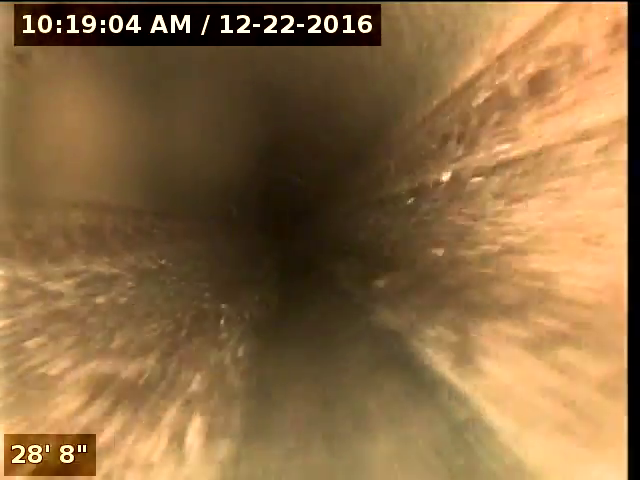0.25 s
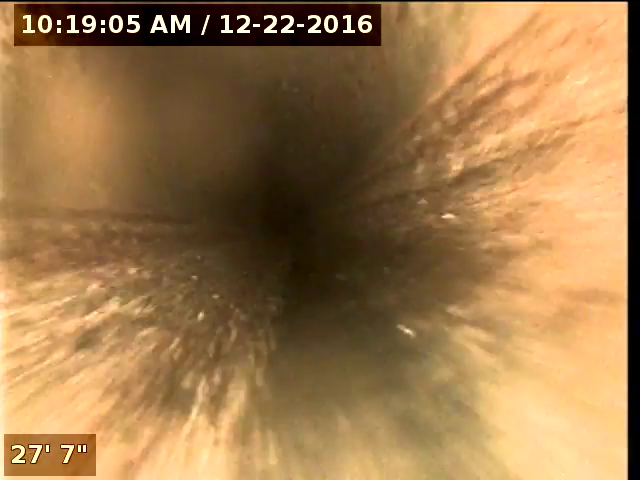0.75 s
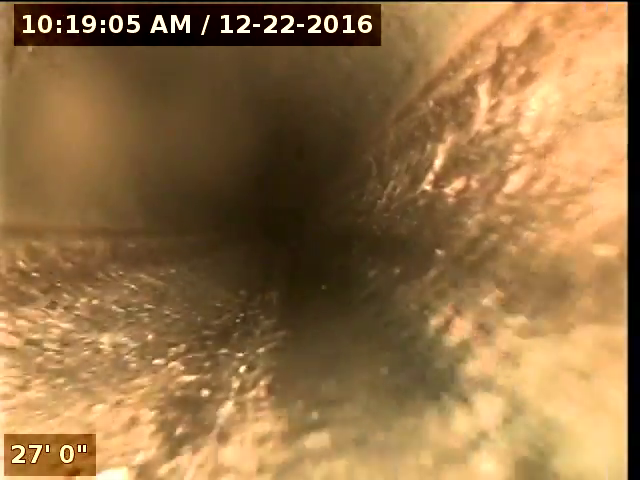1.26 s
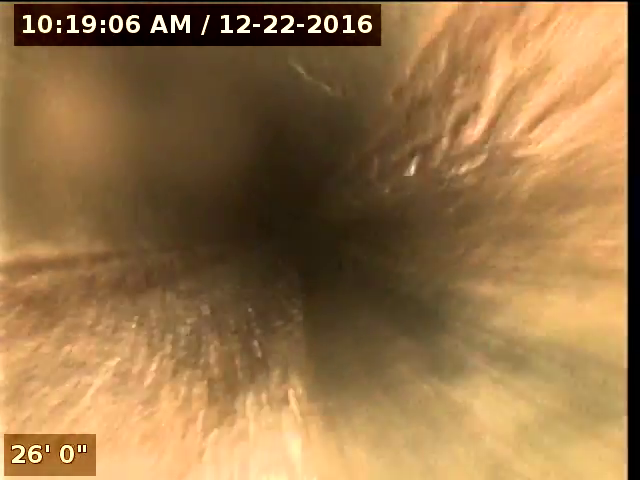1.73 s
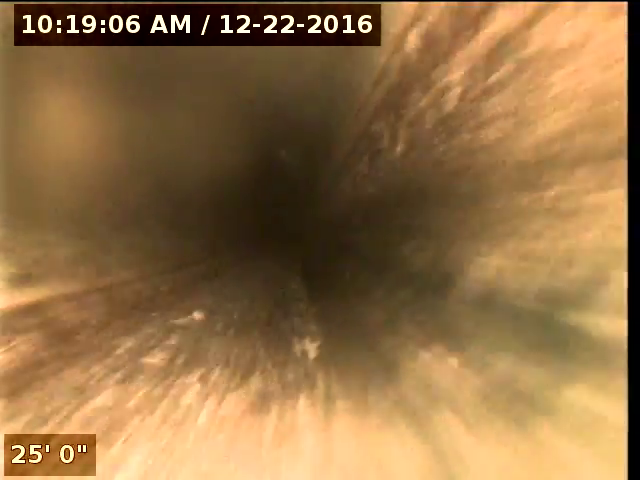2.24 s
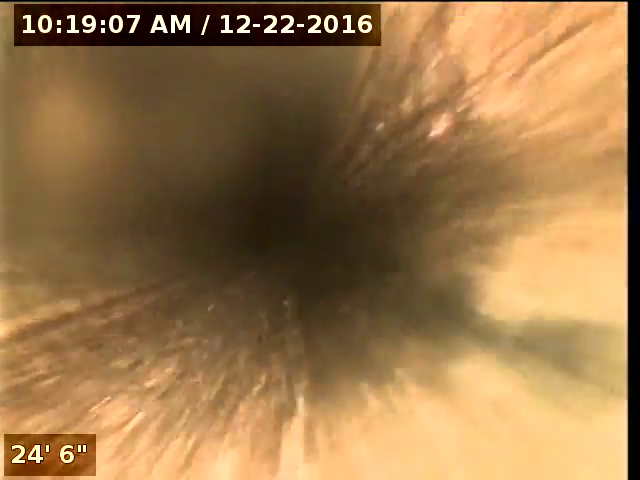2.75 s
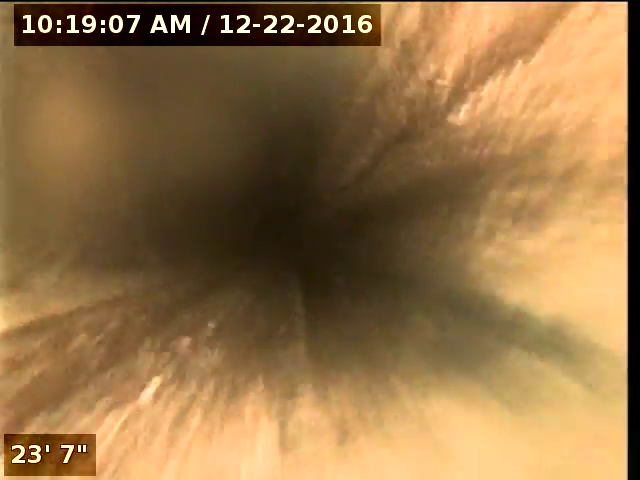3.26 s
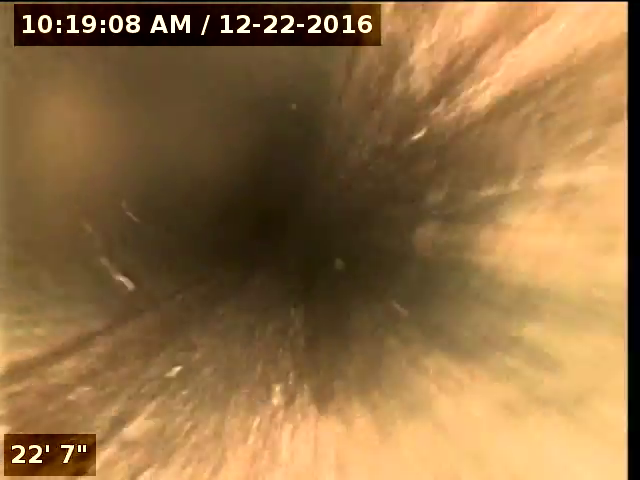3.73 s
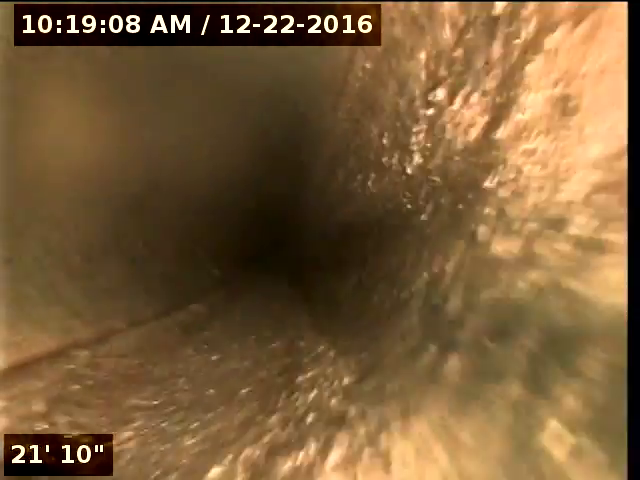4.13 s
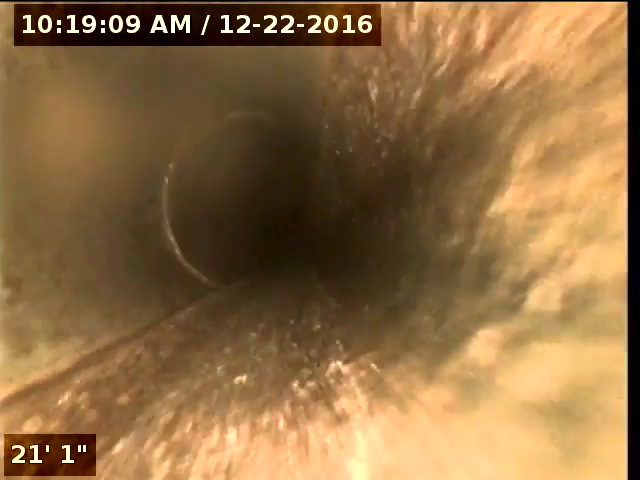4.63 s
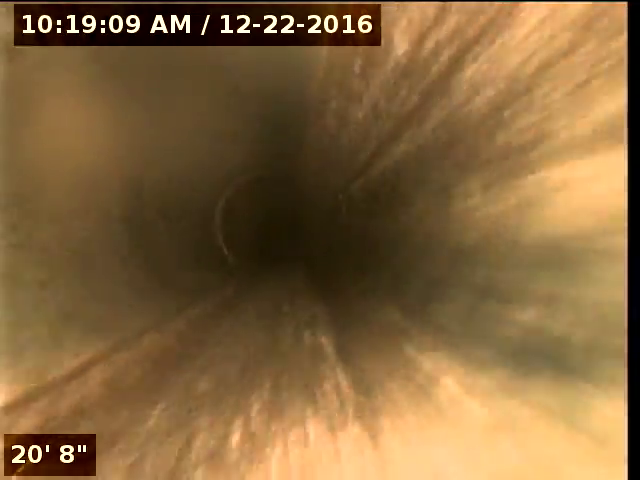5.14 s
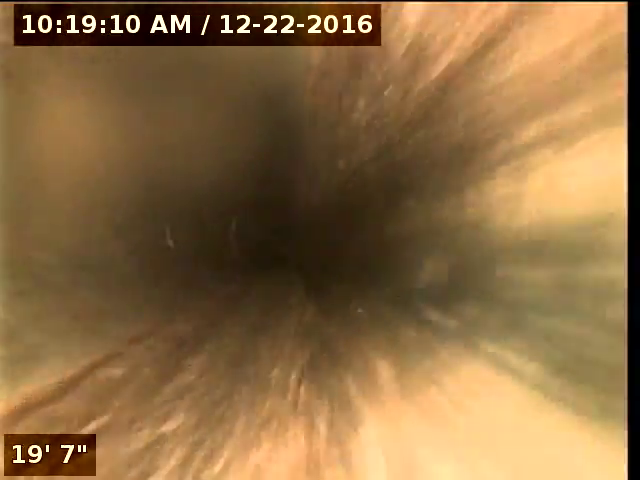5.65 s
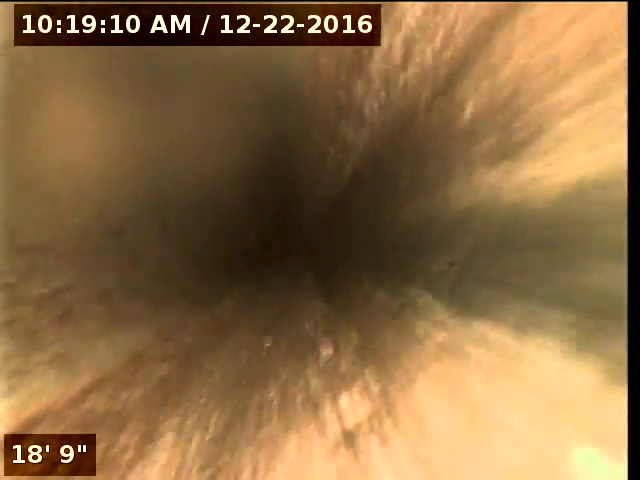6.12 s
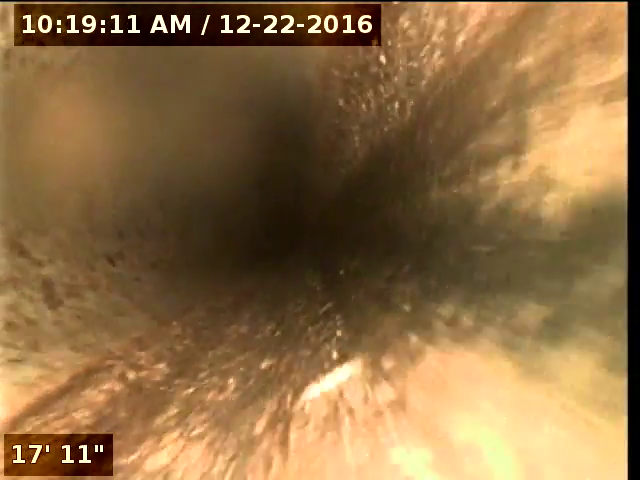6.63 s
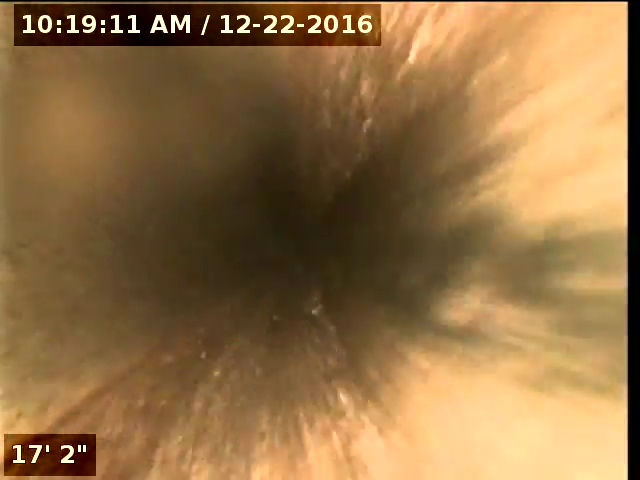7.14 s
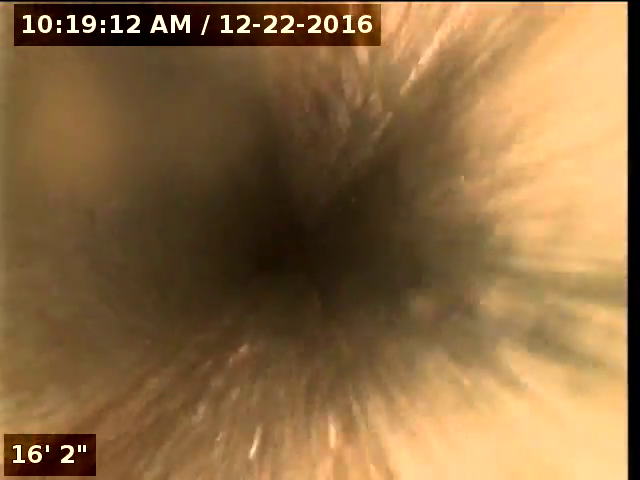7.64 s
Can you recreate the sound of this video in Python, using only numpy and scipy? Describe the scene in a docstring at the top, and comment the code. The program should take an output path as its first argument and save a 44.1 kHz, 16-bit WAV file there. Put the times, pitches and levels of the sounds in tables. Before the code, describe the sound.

Close, muffled and boxy: cable rasps over a pipe edge as its reel rumbles beneath. Uneven knocks clatter, some in tight double hits, with short rattling tails. Soft bumps, tiny gritty snaps and short low groans fill the gaps. A momentary total silence before three seconds is followed by a thin click, then the scraping continues, somewhat lighter, to the end. The cheap microphone overloads on loud slaps.

```python
"""The push cable of an inspection camera is hauled out of a drain pipe and back onto its reel.
It rasps steadily over the pipe's edge and the hollow reel rumbles: noise made of tiny slips, coloured by resonances.
Slaps on the reel, coil bumps and grit ticks are impulses with short noise bursts; groans are wavering sines.
The unit's small, narrow-band microphone overloads lopsidedly; the sound cuts out once and clicks twice."""
import sys
import numpy as np
from scipy import signal
from scipy.fft import rfft, irfft, next_fast_len
from scipy.io import wavfile
from scipy.ndimage import map_coordinates

SR = 44100
rng = np.random.default_rng(int(sys.argv[2]) if len(sys.argv) > 2 else 0)


def store_pcm(level_fs):
    """Save levels as 16-bit WAV."""
    pcm = np.round(np.clip(level_fs, -1, 1) * 32767).astype(np.int16)
    wavfile.write(sys.argv[1], SR, np.atleast_2d(pcm).T)


N = 347498

# The haul, hard at first, then slacker. Each row: time in seconds, pull as nominal rub level in dB,
# nominal rasp level in dB.
HAUL = [(0, -30, -40.5), (.62, -30, -40), (.9, -29.5, -42), (1.5, -32.5, -40), (1.85, -30.5, -41.5),
        (2.15, -34, -41.5), (2.55, -32, -41.5), (2.98, -35, -42), (3.18, -30.5, -42), (3.65, -36, -43),
        (3.94, -32.5, -42.5), (4.42, -37, -44.5), (5.15, -37.5, -44.5), (5.4, -33, -43), (5.82, -39, -43),
        (6.0, -35.5, -40), (6.65, -36.5, -41), (7.15, -34, -40), (7.88, -35, -40)]
# Gritty stretches of cable swish over the edge. Each row: middle in seconds, length in seconds, hiss lift in dB.
SWISHES = [(.52, 0.19, 4.5), (2.385, 0.14, 4.5), (3.918, .2, 4), (5.187, .25, 4.5), (5.997, 0.16, 1.5),
           (6.223, .12, 3.5), (7.33, .18, 4)]
# Cable slaps the reel, some in close pairs. Each row: start in seconds, nominal thud level in dB, thud centre in Hz,
# then nominal boom, clack and tick levels in dB relative to the thud.
SLAPS = [(0.158, -14, 453, -15, -17, -41.5), (0.17, -18, 677, -9, -21, -53),
         (0.322, -17.5, 433, -9, -26, -49), (0.862, -21.5, 715, 1, -12.5, -40),
         (1.067, -8, 520, -4, -5, -27), (1.075, -3, 633, -7, -12, -46), (1.771, -18.5, 695, -7, -34, -49),
         (2.412, -4, 476, -20, -18, -35), (2.416, -8, 760, -19, -23, -49),
         (3.636, -16.5, 650, -28, -23, -51), (3.847, -6, 900, -14, -15, -40),
         (3.852, -3, 500, -16, -17.5, -44.5), (4.213, -11.5, 598, -9, -12.5, -32),
         (5.2705, -10.5, 543, -24, -17, -37), (5.3965, -13, 527, -23, -14, -27.5),
         (7.01, -2, 527, -5.5, -11, -23.5), (7.582, -12.5, 483, -12, -13.5, -40)]
# Coils settle with a dull bump. Each row: start in seconds, nominal level in dB, nominal hum level in relative dB.
BUMPS = [(0.379, -17.5, -3.5), (0.787, -15, -8.5), (1.513, -18, -3.5), (2.436, -18, -7), (2.922, -16, -19),
         (3.055, -21, -16), (3.088, -18, -20), (4.108, -27, -17), (4.675, -17, -25), (4.765, -20, -10),
         (5.343, -17.5, -12), (5.357, -17, -12), (5.616, -22, -3.5), (5.743, -21.5, -19),
         (5.933, -17.5, -18), (6.126, -19, -18), (6.8, -17.5, -11.5), (7.066, -16.5, -11.5)]
# Grit snaps under the cable. Each row: start in seconds, nominal level in dB, nominal hiss level in relative dB.
TICKS = [(0.477, -43.5, -14), (0.7932, -43, -12), (0.8164, -38, -13.5), (1.2963, -42, -5),
         (1.836, -40, -26), (2.3336, -42, -19.5), (2.3853, -41.5, -6), (2.913, -36.5, -15.5),
         (3.2818, -40, -14), (4.444, -35.5, -7.5), (5.085, -41, -14), (5.4608, -40, -13), (5.905, -23, -22),
         (5.992, -38.5, -17), (6.794, -34.5, -19), (7.572, -39, -17), (7.6962, -38, -12),
         (7.714, -38.5, -13)]
# Sliding cable sets one reel resonance groaning. Each row: start in seconds, length in seconds, pitch in Hz,
# rms level at the height of the swell in dB.
GROANS = [(1.98, 0.21, 262, -34), (3.406, 0.16, 231, -34.5), (4.238, 0.15, 235.7, -33),
          (4.473, 0.13, 233, -32.5), (5.517, 0.1, 231, -33.5), (5.95, 0.25, 262, -30.5),
          (6.183, 0.1, 251, -34), (7.625, 0.082, 219, -25.5)]
# Reel resonances. Each row: centre in Hz, width in Hz, lift in dB.
REEL_MODES = [(205.6, 22, 6), (231, 15.5, 12), (262, 14, 8.5), (295, 36, 4), (436.4, 49, 9), (476, 32, 4.5),
              (585, 50, 5), (721, 99, 7), (826, 110, 2.5), (1192, 140, 3), (1465, 200, 3)]

# Broad spectra, before the reel's lift. Each row: frequency in Hz, relative density in dB per Hz.
# Rumble of the reel under the haul.
RUMBLE_SPECTRUM = [(20, -24), (45, -13), (80, -7), (130, -3), (185, -6), (215, -2.5), (300, 1.5), (360, 2),
                   (450, -23.5), (900, -59.5)]
# Rub of the cable, also the body of a coil bump.
RUB_SPECTRUM = [(150, -42), (280, -15), (380, -2.5), (520, 2), (780, -1), (950, -4.5), (1250, -19.5),
                (2500, -62.5)]
# Rasp over the pipe's edge.
RASP_SPECTRUM = [(400, -33), (800, -1.5), (1050, -0.5), (1450, -4), (1900, -9.5), (2600, -19),
                 (3200, -26.5), (3600, -35), (4000, -54), (5000, -74)]
# Thin treble of sliding, slaps and grit.
HISS_SPECTRUM = [(3000, -47.5), (4000, -17), (4500, 2), (5600, 6.5), (6800, 6), (7800, -0.5), (8300, -20)]
# Mid-band clack of a slap.
CLACK_SPECTRUM = [(450, -40), (850, -14), (1100, -0.5), (1500, -0.5), (2100, -3.5), (2900, -10),
                  (3500, -19.5), (4000, -41.5), (5000, -62)]
# Snap of grit.
GRIT_SPECTRUM = [(900, -21), (1800, -14), (2500, -8), (3150, -11.5), (3500, -18.5), (4000, -33),
                 (5000, -45)]
# Low voice of the reel under a slap.
BOOM_SPECTRUM = [(20, -18.5), (50, -22), (90, -16.5), (170, -9.5), (215, -0.5), (290, 11), (350, 8),
                 (450, -15.5), (900, -49)]
# Hum of the reel under a soft bump.
HUM_SPECTRUM = [(60, -32), (160, -27), (205, -4.5), (240, 1), (285, -4.5), (350, -10.5), (600, -45)]
# Thud hump, centred higher for a harder contact. Each row: multiple of the thud centre, relative density in dB per Hz.
THUD_SHAPE = [(.25, -43), (.6, -16.5), (.82, -4.5), (1, 0.5), (1.25, -7.5), (1.7, -8.5), (2.4, -25),
              (4.5, -57.5)]

# The signal cuts out. One row: from in seconds, to in seconds.
DROPOUT = (2.693, 2.820)
# Thin clicks: one just after the sound returns, and a later electrical one on the microphone line. Each row:
# time in seconds, impulse level in dB before the band limit.
CLICKS = [(2.889, -21.5), (6.849, -28.5)]

RUMBLE_DB, MID_PULL_DB, RUMBLE_DB_PER_PULL_DB = -35, -33.5, .65  # rumble level at a middling pull, and its growth
HISS_DB = -68  # steady: does not follow the haul table
SLAP_RATTLE = 0.54  # scales the frame's rattle after each slap
TOP_HZ = 8317


def amp(db):
    """Decibels to gain."""
    return 10 ** (np.asarray(db) / 20)


def unit(x):
    """Scale to rms 1."""
    return x / np.sqrt(np.mean(x ** 2) + 1e-20)


def wobble(rate_hz):
    """Smooth random curve through rate_hz knots a second."""
    knots = rng.standard_normal(int(N * rate_hz / SR) + 4)
    return map_coordinates(knots, [np.arange(N) * rate_hz / SR])


def add(track, start_s, sound):
    """Mix a sound in at start_s."""
    part = track[max(round(start_s * SR), 0):][:len(sound)]
    part += sound[:len(part)]


def through_reel(x, spectrum, travel_s=0):
    """Minimum-phase colour, broad spectrum plus reel modes; travel_s is the delay of a 500 Hz bending wave."""
    size = 2 * next_fast_len(len(x) // 2 + 8192)
    hz = np.fft.rfftfreq(size, 1 / SR)
    point_hz, point_db = np.transpose(spectrum)
    db = np.interp(np.log(hz + 1), np.log(point_hz), point_db)
    db -= 20 * np.log(np.maximum(hz / point_hz[-1], 1))  # about 14 dB per octave beyond the last point
    for centre_hz, width_hz, lift_db in REEL_MODES:
        db += lift_db / (1 + (2 * (hz - centre_hz) / width_hz) ** 2)
    # folding the cepstrum gives a causal response
    cepstrum = irfft(np.log(amp(db)))
    cepstrum[1:size // 2] *= 2
    cepstrum[size // 2 + 1:] = 0
    # bending waves speed up with the root of frequency: the treble arrives first
    lag_rad = 4 * np.pi * travel_s * np.sqrt(500 * hz)
    response = np.exp(rfft(cepstrum) - 1j * lag_rad)
    return irfft(rfft(x, size) * response)[:len(x)]


def friction(spectrum, rate_hz, spread_db, smooth):
    """Tiny slips of random sign and uneven size, rate_hz on average, over a smooth rush; rms 1."""
    slipping = rng.random(N) < rate_hz / SR
    slips = slipping * rng.choice([-1, 1], N) * amp(spread_db * rng.standard_normal(N))
    rush = smooth * rng.standard_normal(N)
    return unit(through_reel(unit(slips) + rush, spectrum))


def burst(t_s, t60_s, rise_s):
    """Noise that builds over rise_s and decays 60 dB in t60_s; the same energy as a unit impulse."""
    envelope = amp(-60 * t_s / t60_s) * -np.expm1(-t_s / rise_s)
    return unit(rng.standard_normal(len(t_s)) * envelope) / np.sqrt(len(t_s))


def blow(spectrum, travel_s, rise_s, chatter, chatter_t60_s, tail, tail_t60_s):
    """One contact, a short chatter as the cable lies down and a longer frame rattle, at a fixed energy."""
    t_s = np.arange(SR // 2) / SR
    force = (t_s == 0) + chatter * burst(t_s, chatter_t60_s, rise_s)
    force = force + tail * burst(t_s, tail_t60_s, rise_s)
    return unit(through_reel(force, spectrum, travel_s)) * amp(-25.5)


def ticks():
    """Grit gives a thin, quickly damped snap."""
    out = np.zeros(N)
    for start_s, db, hiss_db in TICKS:
        snap = blow(GRIT_SPECTRUM, travel_s=0.001, rise_s=0.00095,
                    chatter=3.2, chatter_t60_s=0.039, tail=1.0, tail_t60_s=0.18)
        hiss = blow(HISS_SPECTRUM, travel_s=0.00038, rise_s=.001,
                    chatter=2.5, chatter_t60_s=.035, tail=1.2, tail_t60_s=.12)
        add(out, start_s, amp(db - 2.5) * snap)
        add(out, start_s, amp(db + hiss_db + 1.0) * hiss)
    return out


def bumps():
    """Soft contacts between coils: a dull body, and low reel resonances that swell and hum briefly."""
    out = np.zeros(N)
    for start_s, db, hum_db in BUMPS:
        body = blow(RUB_SPECTRUM, travel_s=.002, rise_s=0.0022,
                    chatter=0.98, chatter_t60_s=0.01, tail=0.25, tail_t60_s=0.22)
        hum = blow(HUM_SPECTRUM, travel_s=.001, rise_s=0.013,
                   chatter=0.29, chatter_t60_s=0.057, tail=0.38, tail_t60_s=0.31)
        add(out, start_s, amp(db - 3.5) * body)
        add(out, start_s, amp(db + hum_db + 4.5) * hum)
    return out


def groans():
    """Friction feeds a single resonance, which swells and fades with an unsteady pitch."""
    out = np.zeros(N)
    for start_s, length_s, pitch_hz, db in GROANS:
        t_s = np.arange(round(length_s * SR)) / SR
        drift = .025 * np.interp(t_s, np.linspace(0, length_s, 8), rng.standard_normal(8))
        phase_rad = 2 * np.pi * np.cumsum(pitch_hz * (1 + drift)) / SR
        swell = np.sin(np.pi * t_s / length_s)
        add(out, start_s, amp(db) * np.sqrt(2) * swell * np.sin(phase_rad))
    return out


def slaps():
    """A slap runs along the stiff cable: tick, then clack, last the reel's thud and boom; the frame rattles on."""
    out = np.zeros(N)
    for start_s, db, thud_hz, boom_db, clack_db, tick_db in SLAPS:
        thud_spectrum = np.multiply(THUD_SHAPE, [thud_hz, 1])
        tick = blow(HISS_SPECTRUM, travel_s=.0003, rise_s=.002,
                    chatter=3.4, chatter_t60_s=0.037, tail=3.2 * SLAP_RATTLE, tail_t60_s=.22)
        clack = blow(CLACK_SPECTRUM, travel_s=0.001437, rise_s=0.0055,
                     chatter=1.6, chatter_t60_s=.028, tail=1.2 * SLAP_RATTLE, tail_t60_s=0.32)
        thud = blow(thud_spectrum, travel_s=.0035, rise_s=0.0034,
                    chatter=0.71, chatter_t60_s=0.027, tail=SLAP_RATTLE, tail_t60_s=0.3)
        boom = blow(BOOM_SPECTRUM, travel_s=0.001507, rise_s=0.0039,
                    chatter=0.29, chatter_t60_s=0.012, tail=1.4 * SLAP_RATTLE, tail_t60_s=.2)
        add(out, start_s, amp(db + tick_db + 2) * tick)
        add(out, start_s, amp(db + clack_db) * clack)
        add(out, start_s, amp(db + 1) * thud)
        add(out, start_s, amp(db + boom_db + 3.5) * boom)
    return out


def drag():
    """The cable rubs along and the reel rumbles with the pull, whose unevenness sways all layers together."""
    t_s = np.arange(N) / SR
    point_s, rub_points_db, rasp_points_db = np.transpose(HAUL)
    rub_db = np.interp(t_s, point_s, rub_points_db)
    rasp_db = np.interp(t_s, point_s, rasp_points_db)
    rumble_db = RUMBLE_DB + RUMBLE_DB_PER_PULL_DB * (rub_db - MID_PULL_DB)
    hiss_db = np.full(N, float(HISS_DB))
    for middle_s, length_s, lift_db in SWISHES:
        place = np.clip((t_s - middle_s) / length_s, -.5, .5)
        hiss_db += lift_db * np.cos(np.pi * place) ** 2
    sway = wobble(24)
    rumble = friction(RUMBLE_SPECTRUM, rate_hz=500, spread_db=2, smooth=1.1)
    rub = friction(RUB_SPECTRUM, rate_hz=550, spread_db=2.5, smooth=0.82)
    rasp = friction(RASP_SPECTRUM, rate_hz=1500, spread_db=1.0, smooth=1.0)
    hiss = friction(HISS_SPECTRUM, rate_hz=3800, spread_db=6.0, smooth=1.8)
    out = amp(rumble_db + 0.88 * sway) * rumble
    out += amp(rub_db - 1.0 + 1.1 * sway) * rub
    out += amp(rasp_db + 0.87 + 0.77 * sway) * rasp
    out += amp(hiss_db + .4 * sway) * hiss
    return out


def scene():
    """Everything reaches one microphone."""
    return (ticks() + bumps() + groans() + slaps() + drag())[None]


def record(dry):
    """Lopsided overload adds a low thump to loud knocks; then the dropout, the clicks and the narrow band."""
    lopsided, thump, thump_hz, ceiling = 0.87, -0.03, 53.5, .94
    # one-sided overload shifts the resting level for as long as the knock lasts
    lowpass = signal.butter(2, thump_hz, fs=SR, output="sos")
    shift = signal.sosfilt(lowpass, dry ** 2)
    bent = np.expm1(lopsided * dry) / lopsided + thump * shift
    bent = np.clip(bent, -ceiling, ceiling)
    t_s = np.arange(N) / SR
    bent = bent * ((t_s < DROPOUT[0]) | (t_s > DROPOUT[1]))
    for click_s, db in CLICKS:
        add(bent[0], click_s, amp([db]))
    size = next_fast_len(N + SR // 2)
    in_band = np.fft.rfftfreq(size, 1 / SR) < TOP_HZ
    return irfft(rfft(bent, size) * in_band, size)[:, :N]


dry = scene()
out = record(dry)
store_pcm(out)
```